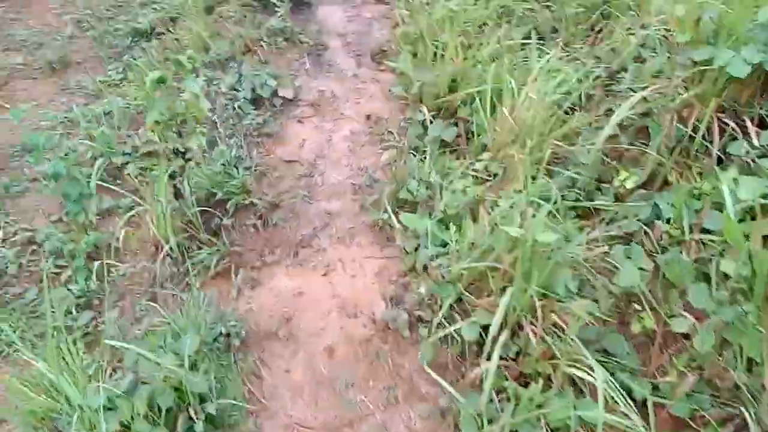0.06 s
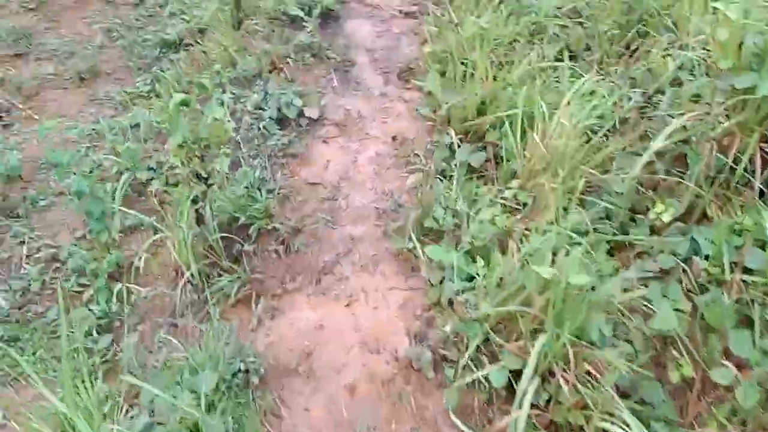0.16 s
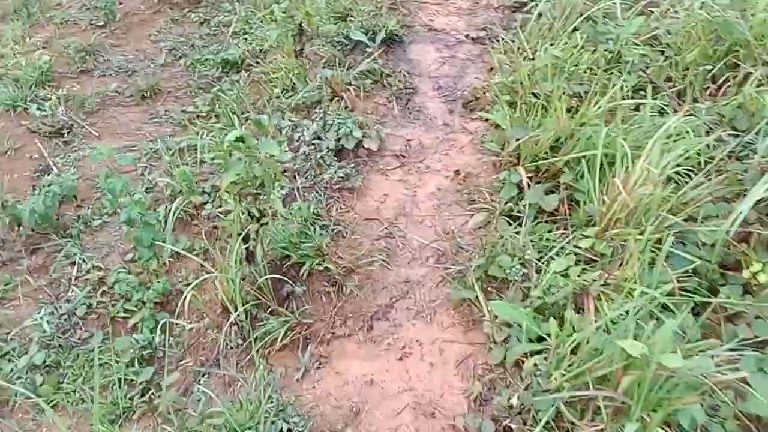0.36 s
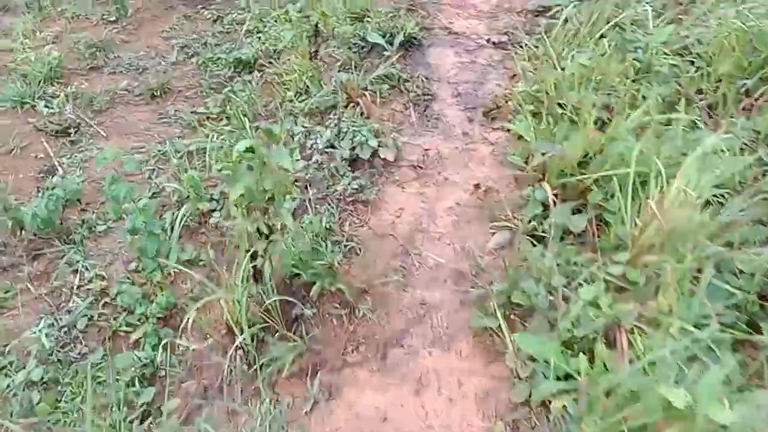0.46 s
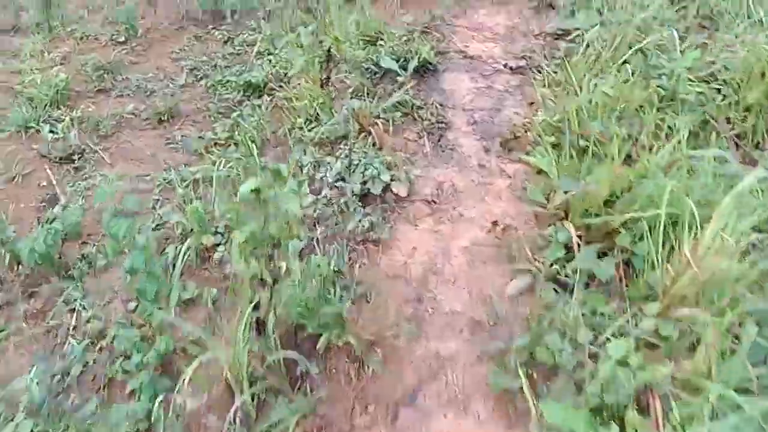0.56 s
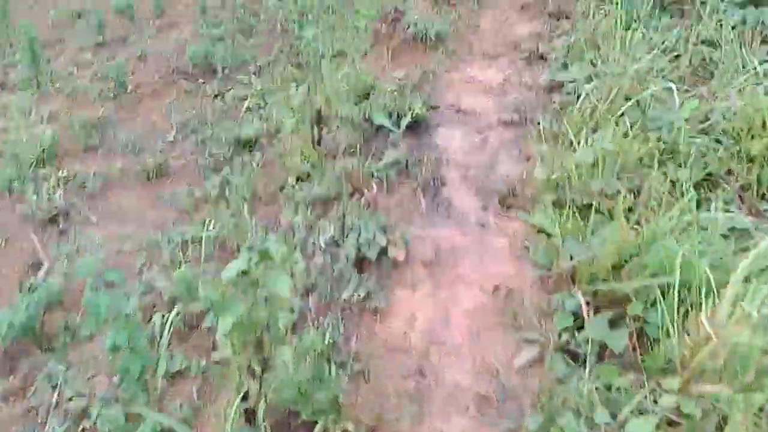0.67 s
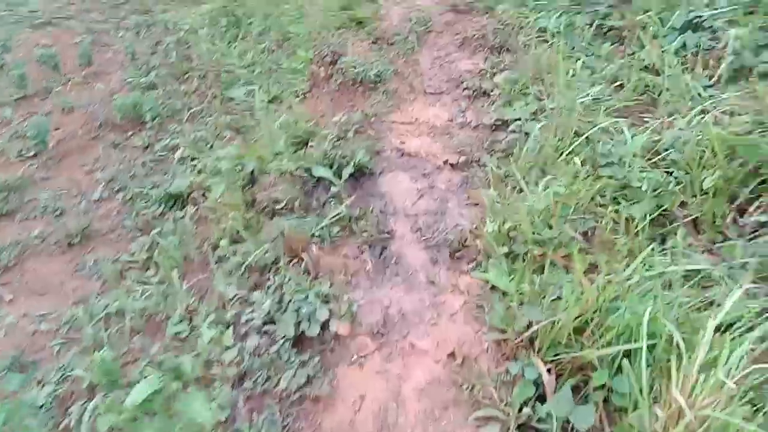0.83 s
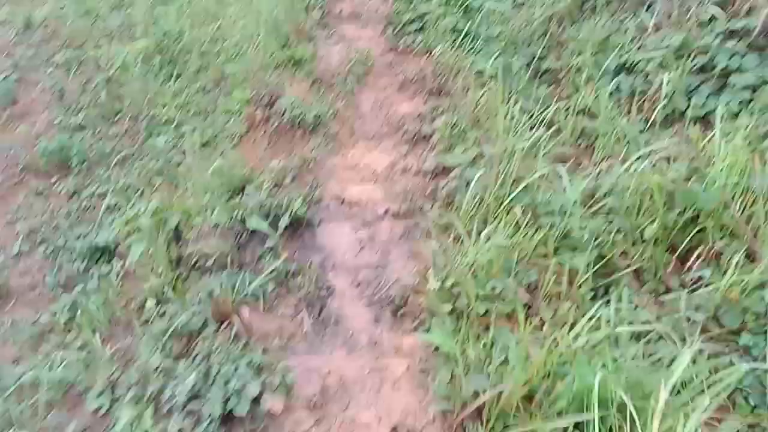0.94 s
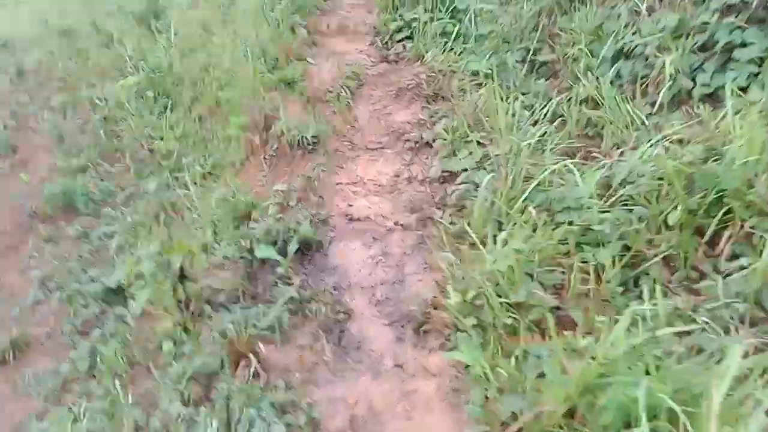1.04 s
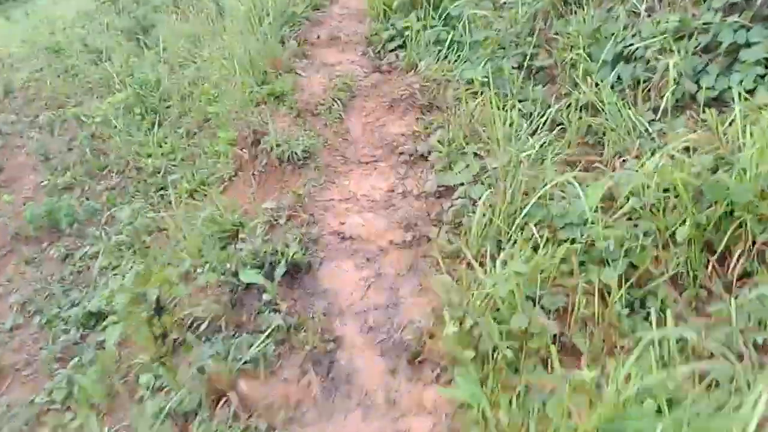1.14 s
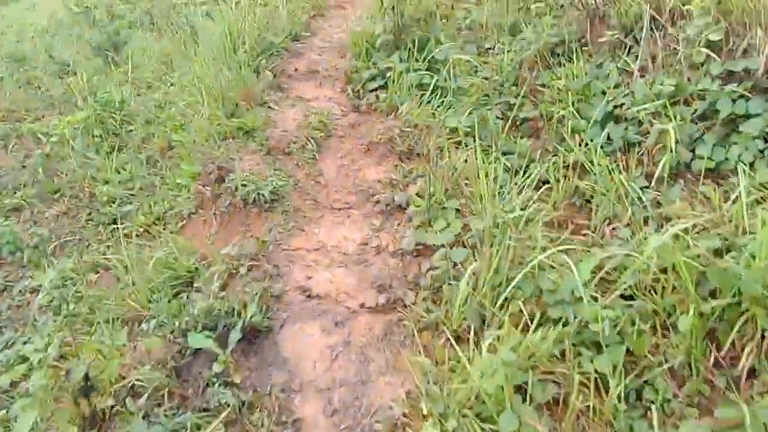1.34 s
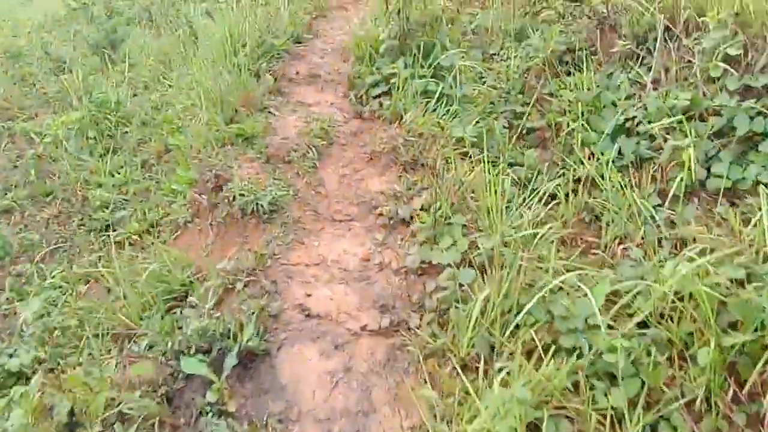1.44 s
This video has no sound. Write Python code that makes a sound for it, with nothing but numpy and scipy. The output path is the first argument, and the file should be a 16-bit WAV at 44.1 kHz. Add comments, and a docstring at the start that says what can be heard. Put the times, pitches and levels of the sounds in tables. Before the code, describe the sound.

Squelchy footsteps cross a wet muddy path. From about 0.2 to 0.4 seconds, the closest, loudest step smacks, scuffs and thuds, with small wet plops. Two lighter steps, at about 0.6 and 1.1 seconds, pat down, swish through wet grass and each end in a splat. Far insects make a faint, steady hiss throughout, and a high cricket trill grows a little louder around 1.3 seconds.

```python
"""A close step scuffs and thuds through the mud of a wet path between grass.
Two lighter steps follow: they pat down, swish through wet grass and end in a splat.
The heel smacks, the sole knocks and rubs, mud tears, and water squeezes out, with small wet plops.
Far insects trill in the field behind, and a bush cricket's high chirps grow louder near the end."""
import sys
import numpy as np
from scipy import signal
from scipy.fft import rfft, irfft
from scipy.io import wavfile

SR = 44100
rng = np.random.default_rng(int(sys.argv[2]) if len(sys.argv) > 2 else 0)


def persist_wave(psi):
    """Save psi, clipped to +-1, as 16-bit WAV."""
    counts = np.round(np.clip(psi, -1, 1) * 32767).astype(np.int16)
    wavfile.write(sys.argv[1], SR, np.atleast_2d(counts).T)


N = 66150
T = np.arange(N) / SR

# tone of still air and of far insects: f/Hz, level/dB
AIR_TONE = [(35, -37), (80, 3), (200, -3), (380, 5), (700, -3), (1500, -7), (2700, -3.5), (4200, -34),
            (9000, -27), (14000, -53)]
INSECT_TONE = [(5300, -44), (5900, -16), (6150, 8.5), (6600, 1.5), (7400, 0.5), (8400, -35), (9600, -44),
               (10800, -36)]
# bush cricket: t/s, level/dB, f/Hz at the start of a chirp
CRICKET = [(0, -83, 10500), (.3, -84, 9900), (.47, -70, 10170), (.85, -78, 10200), (.97, -68.5, 9850),
           (1.301, -55, 9680), (1.42, -62, 9930), (1.5, -57.5, 9760)]
# legs in wet grass: t/s, swish level/dB, treble level/dB
GRASS_LEVELS = [(.3, -89, -88), (.47, -63, -66), (0.52, -48, -55.5), (.55, -41.5, -60), (.578, -37.5, -51),
                (.6, -47, -64), (.62, -43, -57), (.642, -39.5, -42), (.672, -39, -44.5), (.705, -48, -57),
                (0.751, -48, -45), (.79, -51, -55.5), (0.892, -54.5, -54), (0.926, -65.5, -70),
                (1.04, -62, -59), (1.069, -45.5, -41), (1.12, -44.5, -46.5), (1.15, -45.5, -48.5),
                (1.2, -45, -44), (1.25, -40, -54), (1.295, -57, -48), (1.34, -52.5, -52), (1.372, -58, -62),
                (1.4, -67, -71)]
# tone of the swish and of its treble: f/Hz, level/dB
GRASS_TONE = [(200, -26), (600, -30), (1100, -18), (1700, -18), (2300, -12), (2900, -2), (3900, -2.5),
              (4600, -6.5), (5150, -3.5), (5600, -17.5), (9000, -29)]
GRASS_TREBLE = [(4500, -36.5), (6300, -10), (7200, -2.5), (7800, 6), (8800, -7), (9700, -13.5),
                (10400, -26), (11400, -26.5), (14500, -44)]
# snaps of mud and stalks: t/s, level/dB, f/Hz above which they are dulled
SNAPS = [(0.0779, -36, 2800), (0.081, -37, 2720), (.831, -59, 7000), (0.85, -53.5, 6900),
         (0.891, -47.5, 4940), (0.891, -41.5, 5000), (0.95, -58, 4000), (1.0053, -44, 3500),
         (1.0132, -30, 7000), (1.022, -44, 5000), (1.051, -28.5, 6000), (1.063, -30, 7000),
         (1.469, -49.5, 8000)]
# their tone: f/Hz, level/dB
SNAP_TONE = [(200, -10), (800, -10.5), (1500, 0), (2900, -9), (4100, 3.5), (5500, -16.5), (8000, -8.5),
             (12000, -16)]
# the sole slipping, and weight rolling onto it: t/s, level/dB, half length/s
SOLE_SLIPS = [(0.561, -51, 0.034), (0.673, -50, 0.031), (1.083, -53, 0.023), (1.201, -46.5, 0.053)]
SOLE_PRESSES = [(0.567, -47, 0.021), (0.685, -52, 0.039), (1.072, -46, 0.017), (1.227, -51.5, 0.013)]
# their tones: f/Hz, level/dB
SLIP_TONE = [(250, -6.5), (550, 2), (900, 0.5), (1500, 3), (2200, 0.5), (3000, -12)]
PRESS_TONE = [(40, -29), (90, 1.5), (200, -13), (500, -11.5), (900, -13), (2000, -24)]
# water squeezed out: t/s, level/dB, half length/s, f/Hz, pitch spread/Hz, sinking rate/(1/s)
WATER_SQUEEZES = [(0.032, -51, .03, 465, 127, 1), (0.218, -40, 0.025, 607, 193, 0.26),
                  (.585, -45, 0.031, 2925, 450, 0.23), (1.141, -43, 0.01905, 1035, 171, 0.915),
                  (1.124, -38.5, 0.019, 3170, 910, 0.99), (1.174, -41.5, .03, 2704, 750, 0.54),
                  (1.182, -52, .025, 327.6, 49.7, 0.28)]
# sharp smacks of the heel striking mud, and small wet plops: t/s, level/dB, f/Hz, swell time/s
SMACKS_AND_PLOPS = [(0.2357, -16, 1230, 0.00026), (.3655, -20.5, 812, 0.004), (.381, -15.5, 1090, 0.00058),
                    (1.048, -41.5, 885, 0.0035), (1.0516, -17, 854, 0.00082), (1.0859, -36, 620, 0.0016)]
# mud tearing: t/s, level/dB, decay time/s, extra level for the spray/dB
MUD_SPLATS = [(0.378, -23, 0.00067, -12.5), (0.6239, -32, 0.0047, -26), (0.631, -29.5, 0.0042, -17),
              (0.6736, -27.5, 0.009, -3.5), (0.681, -19.5, 0.003, -23), (0.6842, -21.5, 0.0011, -4),
              (.6875, -42, 0.0034, 12.5), (1.2116, -24.5, 0.0046, 1), (1.2247, -26, 0.0049, 6),
              (1.231, -25, 0.0038, 0), (1.2403, -34, 0.0022, 0), (1.313, -44.5, 0.0015, 10.5)]
# tone of a splat's body and of its spray: f/Hz, level/dB
BODY_TONE = [(300, -54), (1000, -17), (2000, -13.5), (3000, -7.5), (4000, 1), (5300, -9), (7000, -10),
             (14000, -82)]
SPRAY_TONE = [(3000, -22), (5500, -20), (7200, 5), (8400, -2), (10000, -20.5), (12000, -27), (14500, -42)]
# the close scuff: t/s, bass level/dB, middle level/dB, treble level/dB
SCUFF_LEVELS = [(0, -46.5, -55.5, -53), (0.046, -58, -55.5, -46.5), (0.063, -54, -65, -59.5),
                (0.167, -69.5, -66, -65), (0.181, -48, -52.5, -54.5), (.198, -56, -60, -71),
                (.206, -49, -52.5, -60), (0.231, -40.5, -52.5, -55.5), (.246, -29.5, -40, -45),
                (0.271, -27, -33, -39.5), (0.29, -31, -26, -29), (.34, -25, -31.5, -32),
                (0.359, -30.5, -31.5, -31.5), (0.379, -27, -25.5, -26.5), (0.393, -30, -35, -30.5),
                (0.424, -39.5, -40.5, -42.5), (.444, -53, -70, -55), (.46, -75, -84, -68),
                (.52, -61, -60, -80), (.6, -100, -110, -110)]
# tone of those three bands: f/Hz, level/dB
BASS_TONE = [(35, -43), (55, -14), (90, -6.5), (170, -1), (320, -1.5), (500, -2.5), (800, -5.5),
             (1100, -7.5), (1800, -32.5)]
MIDDLE_TONE = [(600, -34.5), (1100, 0), (1800, 5.5), (2500, 2), (3200, -7.5), (4200, -35.5)]
TREBLE_TONE = [(2400, -2), (3500, -4.5), (4600, -6), (6200, 3), (7400, -3), (8600, -11.5), (10000, -26),
               (12000, -39), (14500, -72)]
# the sole knocking on mud: t/s, level/dB, f/Hz, fade time/s (to 60 dB down)
SOLE_KNOCKS = [(.173, -14, 176, 0.01), (0.2347, -10, 390, 0.012), (0.283, -17.5, 263, 0.024),
               (0.298, -17.5, 186, 0.042), (0.367, -21, 188, 0.063), (.549, -21.5, 214, 0.01),
               (0.5833, -27, 357, 0.017), (0.6449, -26.5, 307, 0.004), (0.668, -27, 250, 0.0033),
               (1.056, -34, 337, .015), (1.0731, -31.5, 356, 0.015), (1.2144, -28, 321, 0.05),
               (1.236, -33, 193, 0.038)]


def from_db(db):
    """Turn decibels into a gain to multiply by."""
    return 10 ** (np.asarray(db) / 20)


def rms_one(x):
    """Scale a sound to an average power of 1."""
    return x / np.sqrt(np.mean(x ** 2) + 1e-20)


def gains(rows):
    """Turn each level column into a gain that changes over time."""
    times, *columns = np.transpose(rows)
    return [from_db(np.interp(T, times, db)) for db in columns]


def cut(x, order, hz, keep="low"):
    """Keep the low or the high side of a sound; a higher order cuts more steeply."""
    return signal.sosfilt(signal.butter(order, hz, keep, fs=SR, output="sos"), x)


def colour(x, tone):
    """Filter a sound through a tone table, falling 24 dB an octave just past its ends."""
    hz, db = np.transpose(tone)
    size = 2 * N
    octave = np.log2(np.maximum(np.arange(N + 1) * SR / size, 10))
    outside = np.abs(octave - np.clip(octave, np.log2(hz[0]), np.log2(hz[-1])))
    gain = rms_one(from_db(np.interp(octave, np.log2(hz), db) - 24 * np.minimum(outside, 2)))
    # make the filter ring only after a click, never before it
    cepstrum = irfft(np.log(gain))
    cepstrum[1:N] *= 2
    cepstrum[N + 1:] = 0
    return irfft(rfft(x, size) * np.exp(rfft(cepstrum)))[:N]


def grains(per_s, spread_db):
    """Tiny random clicks of uneven size."""
    sizes = from_db(spread_db * np.minimum(rng.exponential(1, N), 4))
    return rms_one(sizes * rng.choice([-1, 1], N) * (rng.random(N) < per_s / SR))


def burst(t, attack_s, decay_s):
    """A fast rise at time t, then a fade."""
    age = np.maximum(T - t, 0)
    return np.minimum(age / attack_s, 1) * np.exp(-np.maximum(age - attack_s, 0) / decay_s)


def swell(t, half_s):
    """A bell-shaped rise and fall around time t."""
    return np.exp(-0.5 * ((T - t) / half_s) ** 2)


def wobble(width_hz):
    """A random swing in strength and phase that makes a tone rough."""
    real, imaginary = rms_one(cut(rng.standard_normal((2, N)), 2, width_hz / 2))
    return real + 1j * imaginary


def glide(hz, swing):
    """A wobbling tone that follows a moving pitch."""
    return np.real(swing * np.exp(2j * np.pi * np.cumsum(hz) / SR))


def bubbles(per_s, low_hz, high_hz, cycles=39, count=24):
    """Tiny bubbles burst at random, each ringing briefly at its own pitch."""
    clicks = grains(per_s, spread_db=4)
    pitch_choice = rng.integers(0, count, N)
    out = np.zeros(N)
    for k, hz in enumerate(np.geomspace(low_hz, high_hz, count)):
        fade = np.exp(-np.log(1000) * hz / (cycles * SR))  # 60 dB down after that many cycles
        ringing = [1, -2 * fade * np.cos(2 * np.pi * hz / SR), fade * fade]
        out += signal.lfilter([1, 0, -1], ringing, clicks * (pitch_choice == k) + 1e-18)
    return rms_one(cut(out, 3, high_hz * 1.22))


def field():
    """Still air and far insects blend into a faint, steady hiss."""
    air = from_db(-64) * colour(rng.standard_normal(N), AIR_TONE)
    insects = from_db(-62) * colour(rng.standard_normal(N), INSECT_TONE)
    return air + insects


def cricket(chirps_per_s=107, fall_hz=814):
    """A bush cricket trills in quick, rough chirps that each fall in pitch."""
    times, db, start_hz = np.transpose(CRICKET)
    stroke = (T * chirps_per_s) % 1
    pitch = np.interp(T, times, start_hz) - fall_hz * stroke
    chirps = np.sin(np.pi * stroke) * glide(pitch, 1 + 1.6 * wobble(width_hz=500))
    return from_db(np.interp(T, times, db)) * rms_one(chirps)


def grass():
    """Wet blades brush the legs, and droplets flick off them."""
    swish_gain, treble_gain = gains(GRASS_LEVELS)
    swish = colour(swish_gain * grains(per_s=9000, spread_db=1.5), GRASS_TONE)
    treble = colour(treble_gain * grains(per_s=9000, spread_db=1.5), GRASS_TREBLE)
    droplets = from_db(-8.5) * swish_gain * bubbles(per_s=200, low_hz=2800, high_hz=5400)
    return swish + treble + droplets


def snaps():
    """Mud and stalks snap with small ticks, duller where the mud is soft."""
    crackle = grains(per_s=10000, spread_db=1)
    out = np.zeros(N)
    for t, db, hz in SNAPS:
        tick = from_db(db) * burst(t, attack_s=0.00032, decay_s=0.0014) * crackle
        out += cut(tick, 4, hz)
    return colour(out, SNAP_TONE)


def slips():
    """The sole rubs a little as the lighter steps settle."""
    rubbing = sum(from_db(db) * swell(t, half_s) for t, db, half_s in SOLE_SLIPS)
    return colour(rubbing * grains(per_s=2300, spread_db=3), SLIP_TONE)


def presses():
    """Mud gives way under the walker's weight with a low crackle."""
    weight = sum(from_db(db) * swell(t, half_s) for t, db, half_s in SOLE_PRESSES)
    return colour(weight * grains(per_s=430, spread_db=2.5), PRESS_TONE)


def squelches():
    """Water squeezes out through gaps under the sole, sinking in pitch."""
    out = np.zeros(N)
    for t, db, half_s, hz, width_hz, sink_per_s in WATER_SQUEEZES:
        pitch = hz * np.exp(-sink_per_s * np.clip(T - t, -2 * half_s, 2 * half_s))
        out += from_db(db) * swell(t, half_s) * glide(pitch, wobble(width_hz))
    return out


def smacks_and_plops(sink_per_s=27.5, tail_stretch=1.42):
    """Sharp smacks of the heel striking mud, and small wet plops: each is a very short, sinking tone."""
    out = np.zeros(N)
    for t, db, hz, swell_s in SMACKS_AND_PLOPS:
        age = T - t
        pitch = hz * np.exp(-np.clip(sink_per_s * age, -0.5, 0.5))
        cycles = np.cumsum(pitch) / SR
        cycles -= np.interp(t, T, cycles)  # the wave peaks at time t
        shape = np.where(age < 0, swell(t, swell_s), swell(t, swell_s * tail_stretch))
        out += from_db(db) * shape * np.cos(2 * np.pi * cycles)
    return out


def splats(attack_s=0.0013, spray_db=-2):
    """Films of wet mud tear in short, crackling bursts with a bright spray."""
    body, spray = np.zeros((2, N))
    for t, db, decay_s, extra_db in MUD_SPLATS:
        tear = from_db(db) * burst(t, attack_s, decay_s)
        body += tear
        spray += from_db(spray_db + extra_db) * tear
    return (colour(body * grains(per_s=10000, spread_db=1.5), BODY_TONE)
            + colour(spray * grains(per_s=10000, spread_db=1), SPRAY_TONE))


def scuff():
    """The close step slides: rubbing makes dense tiny clicks, and bubbles burst in the mud."""
    bass, middle, treble = gains(SCUFF_LEVELS)
    bands = (bass, BASS_TONE), (middle, MIDDLE_TONE), (treble, TREBLE_TONE)
    rubbing = sum(colour(gain * grains(per_s=7000, spread_db=2), tone) for gain, tone in bands)
    fizz = from_db(-9.5) * middle * bubbles(per_s=410, low_hz=750, high_hz=2800)
    return rubbing + fizz


def thuds():
    """Each knock of the sole is one low note that the mud stops quickly."""
    out = np.zeros(N)
    for t, db, hz, fade_s in SOLE_KNOCKS:
        age = np.maximum(T - t, 0)
        out -= from_db(db - 60 * age / fade_s) * np.sin(2 * np.pi * hz * age)
    return cut(out, 2, hz=75, keep="high")


def scene():
    """The field and the walker, together in one channel."""
    background = field() + cricket()
    details = grass() + snaps() + slips() + presses() + squelches()
    steps = smacks_and_plops() + splats() + scuff() + thuds()
    return (background + details + steps)[None]


def record(dry):
    """The microphone loses the deepest bass, and the highest treble is cut."""
    thin = cut(dry, 3, hz=49, keep="high")
    treble_cut = signal.cheby2(12, 70, 15500, fs=SR, output="sos")  # 70 dB down from 15500 Hz up
    return signal.sosfilt(treble_cut, thin)


dry = scene()
out = record(dry)
persist_wave(out)
```